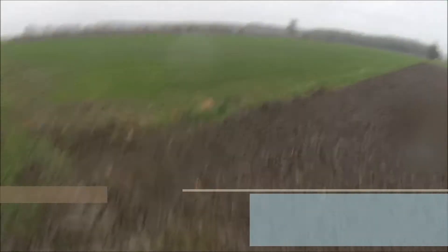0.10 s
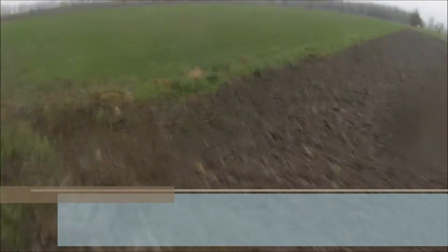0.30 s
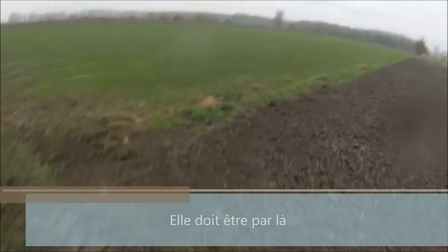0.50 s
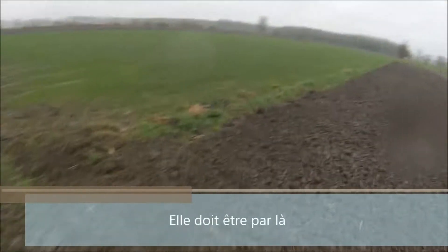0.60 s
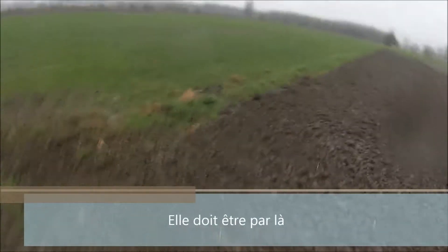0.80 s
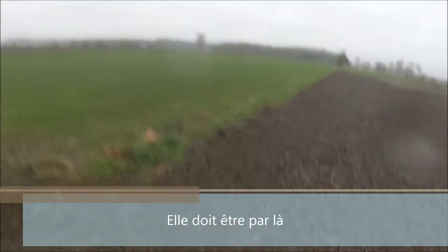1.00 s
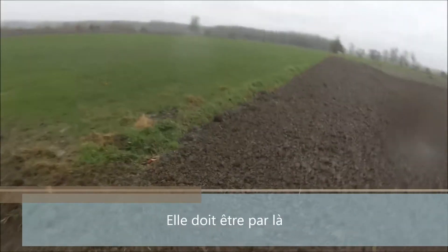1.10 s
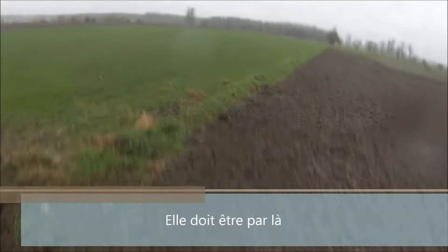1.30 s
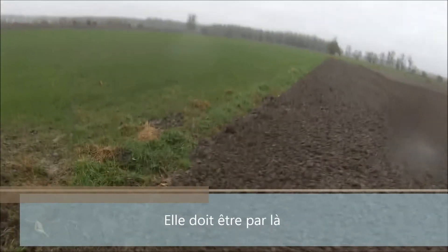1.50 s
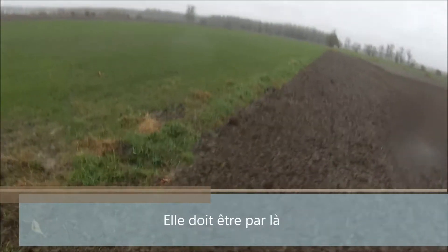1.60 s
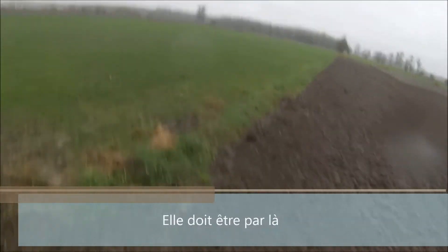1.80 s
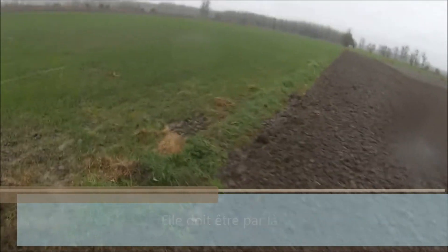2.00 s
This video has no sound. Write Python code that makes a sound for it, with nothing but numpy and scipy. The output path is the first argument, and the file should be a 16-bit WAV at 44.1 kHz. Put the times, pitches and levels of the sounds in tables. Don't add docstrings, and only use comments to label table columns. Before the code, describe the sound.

Rain ticking and pattering on a plastic shell, with low walking jolts and faint cloth rustle

```python
import sys
import numpy as np
from scipy import signal
from scipy.io import wavfile

SR = 44100
rng = np.random.default_rng(int(sys.argv[2]) if len(sys.argv) > 2 else 0)


def to_wav(s):
    ch = np.atleast_2d(s).T
    pcm = np.round(np.clip(ch, -1, 1) * 32767)
    wavfile.write(sys.argv[1], SR, pcm.astype(np.int16))


def ratio_of_db(decibels):
    return 10 ** (np.asarray(decibels, float) / 20)


N = 92610

# (frequency [Hz], level [dB])
HISS_COLOUR = [(70, -13.5), (150, -7), (350, -7), (900, -14), (1900, -13.5), (3500, -19.5), (11000, -30.5),
               (15000, -34.5)]
# (frequency [Hz], level [dB], decay by 60 dB [s])
SHELL_MODES = [(1650, 0, .0105), (2640, -2, .008), (5550, -13, .006), (1850, -34, .075), (6500, -44, .045),
               (400, -23, .005), (1300, -16, .006), (3300, -9, .006), (4300, -22, .004), (7200, -16, .004),
               (8500, -20, .003), (9800, -21, .003), (12200, -25, .003), (14000, -33, .003)]
# (frequency [Hz], level [dB], decay by 60 dB [s])
PANE_MODES = [(2170, -24, .055), (2240, -5, .009), (3120, -28, .04)]
OPPOSED_MODES_HZ = (400, 1300, 2240, 3300)
# (time [s], peak [dB], upper modes against lower [dB], brightness [dB])
SMALL_DROPS = [(0.0074, -47, -12, 11), (0.0186, -38.5, -6, 17), (0.1454, -48, 2, -8),
               (0.1705, -43.5, -6, -3), (0.197, -49, -3, 1), (0.3008, -48, 5, 11), (0.3227, -44.5, -6, 11),
               (0.3601, -39.5, 8, -4), (0.3835, -40, -2, 10.5), (0.408, -54, -6, 2), (0.4394, -42.5, 1, -4),
               (0.5407, -43, 7, 7), (0.5616, -42, 7, 3), (0.5836, -41.5, 4.5, 9.5), (0.614, -50, -9, 0.2),
               (0.637, -42, -3, 19), (0.6689, -48, -2, 18), (0.7706, -50, 4, 15), (0.8051, -41.5, -19, 12),
               (0.8673, -45, -17, 0.2), (0.8949, -46, 4, -4), (1.0106, -43.5, -9, 0.2),
               (1.1648, -46, -13, 8), (1.2645, -43, -7, 1), (1.4147, -43.5, 5, 2), (1.701, -39.5, 2, -9),
               (1.722, -45, 7, -7), (1.744, -39.5, 22, 1), (1.7809, -53, -1, 13), (1.7921, -47, 7, 5.5),
               (1.8317, -55, 2, 5), (1.8552, -49, 3, 22), (1.922, -46, -5, -5), (2.003, -51, -8, -5),
               (1.1243, -50, 15, 12)]
# (time [s], peak [dB], upper modes against lower [dB], brightness [dB], share of the pane [dB])
BIG_DROPS = [(.0235, -30.5, -6, -18, -12), (.0285, -25, 2, -6, 6), (.0296, -18, -2.5, -5.5, 6),
             (.1324, -21, -9.5, -18, 7.5), (.1343, -21.5, -4, -14, 5), (.2192, -29.5, 1.5, 3.5, -4),
             (.2222, -33, -16, -7, -12), (.2289, -27.5, 9, -3, 21), (.238, -35.5, 17, 11, 7),
             (.2655, -31.5, 1.5, 0.5, 3), (.5148, -15, 2, 3, -16), (.8558, -36, -9.5, 12, -1.5),
             (1.0552, -16, 6.5, 5.5, 9.5), (1.2219, -33, 2, -3, -18), (1.5364, -36.5, 2, 9, 16),
             (1.5435, -45, 3, -1, 10), (1.6221, -26, 8, 13, 14), (1.8822, -30.5, 15, 2, 19.5),
             (1.9655, -8.5, 2, 1, 3.5), (2.013, -38, 3, -22, -7), (2.0274, -8, 0, 1, -5)]
# (time [s], peak [dB], upper modes against lower [dB], brightness [dB], share of the pane [dB])
SHARP_DROPS = [(.1098, -37.5, 10, 5.5, -7), (.2641, -27.5, -5, 7.5, 1), (1.0885, -35, 8, 0, -12),
               (1.4225, -46.5, 6, 6, 5), (1.4882, -34.5, 13.5, 1.5, 9), (1.501, -53, 6, 9, 16),
               (1.5405, -39.5, 9, 11, 0), (1.612, -65, 8, 22, -3), (1.6394, -37, 6, 8, 1),
               (1.7499, -32, 13.5, 2, 13.5), (1.932, -31, 0, 2.5, -22), (1.947, -43, -6, 1, 3)]
# (time [s], rustle [dB], dull body [dB], length [s])
WEIGHT_SHIFTS = [
    (0.023, -54.5, -55.5, 0.012),
    (0.252, -50.5, -50, 0.02),
    (0.425, -62.5, -79, 0.044),
    (0.681, -55.5, -51, 0.01),
    (0.971, -66, -77, 0.026),
    (1.11, -65.5, -69.5, 0.046),
    (1.392, -91, -70.5, 0.047),
    (1.498, -67, -67.5, 0.011),
    (1.622, -58, -62, 0.015),
    (1.734, -66, -74, 0.014),
]
# (frequency [Hz], level per Hz [dB])
CLOTH_COLOUR = [(300, -10), (900, -9), (1800, 0), (2500, -3), (3800, -10), (6000, -15), (9500, -23),
                (13000, -40)]
# (frequency [Hz], level per Hz [dB])
BODY_COLOUR = [(70, -18), (130, 1), (300, -3), (600, -14.5), (1500, -37)]
# (time of the upward swing [s], peak [dB], frequency [Hz], dying time [s])
STEP_JOLTS = [(0.2635, -5.6, 27.9, 0.0156), (0.2789, -15.2, 33.3, 0.0246), (0.3021, -24.0, 47.8, 0.004),
              (0.6405, -27.0, 31.8, 0.05), (0.6846, -9.8, 34.0, 0.0127), (0.7242, -23.3, 42.1, 0.0158),
              (0.7872, -34.0, 18.0, 0.033), (1.0101, -33.9, 29.1, 0.0311), (1.1092, -26.2, 36.0, 0.05),
              (1.1501, -19.2, 30.4, 0.0106), (1.2055, -27.9, 18.0, 0.0048), (1.2497, -34.2, 19.8, 0.0308),
              (1.6392, -15.2, 26.6, 0.0206), (1.7186, -28.8, 21.2, 0.02)]
# (time [s], level [dB])
SHAKE_LEVEL = [(0.0, -36), (0.12, -31), (0.27, -15), (0.44, -34.5), (0.61, -34.5), (0.83, -32.5),
               (0.99, -36.5), (1.18, -32), (1.32, -32), (1.48, -32.5), (1.68, -20), (1.81, -39),
               (2.1, -34.5)]

UPPER_HZ, BRIGHT_HZ = 2000, 4500


def rms_one(x):
    return x / np.sqrt(np.mean(x ** 2) + 1e-20)


def drift(rate):
    every, settle = 40, 2000
    r = np.exp(-80 * np.pi * rate / SR)
    slow = signal.lfilter([1], [1, -2 * r, r * r], rng.standard_normal(N // every + settle + 2))[settle:]
    return np.interp(np.arange(N) / every, np.arange(len(slow)), rms_one(slow))


def banded_noise(colour, patchy_db):
    shared, shared_per_s, own_per_s = 0.8, 6, 12
    together = drift(shared_per_s)
    edges = 60 * 2 ** np.arange(0, 8.4, 0.5)
    white = rng.standard_normal((2, N))
    at, db = np.transpose(colour)
    out = 0
    for k, (low, high) in enumerate(zip(edges, edges[1:])):
        band = signal.sosfilt(signal.butter(2, [low, high], "band", fs=SR, output="sos"), white[k % 2])
        level = np.interp(np.log(low * high) / 2, np.log(at), db)
        flicker = patchy_db * (shared * together + drift(own_per_s))
        out = out + band * ratio_of_db(level + flicker)
    return rms_one(out)


def field_hiss():
    return ratio_of_db(-62) * banded_noise(HISS_COLOUR, patchy_db=0.66)


def fine_patter():
    per_s, level_db, spread_db = 380, -75.5, 9
    sizes = ratio_of_db(spread_db * np.minimum(rng.exponential(1, N), 4)) * rng.choice([-1, 1], N)
    born = rng.random(N) < per_s * ratio_of_db(4 * drift(5.0)) / SR
    out = 0
    for hz, db, t60 in SHELL_MODES + PANE_MODES[1:2]:
        r, w = ratio_of_db(-60 / (t60 * SR)), 2 * np.pi * hz / SR
        upper_db = -4 * (UPPER_HZ < hz < BRIGHT_HZ)
        favour_db = 8.5 * rng.standard_normal(N)
        clicks = sizes * born * ratio_of_db(db + upper_db + favour_db) + 1e-18
        out = out + signal.lfilter([0, np.sin(w)], [1, -2 * r * np.cos(w), r * r], clicks)
    return ratio_of_db(level_db) * rms_one(out)


def drop_tick(db, upper_db, bright_db, pane_db, dull_db, chance, variation, fizz):
    t = np.arange(3000) / SR
    hz, mode_db, t60 = np.transpose(SHELL_MODES + PANE_MODES)[:, :, None]
    pane = np.arange(len(hz))[:, None] >= len(SHELL_MODES)
    spread, shift, sign = variation

    shell_db = upper_db * (hz > UPPER_HZ) + bright_db * (hz > BRIGHT_HZ)
    level = mode_db + 1.5 * spread + np.where(pane, pane_db, shell_db)
    soft = db < -17
    level = level - soft * (9 * (t60 > 0.03) + dull_db * (hz > 8000))
    detune, damping = (0.04, 0.8) if soft else (0.012, 1)

    together = (db > -29) & (hz < BRIGHT_HZ)
    splash_s, rise_cycles = 0.000695, 0.38
    since = np.maximum(t - splash_s * chance * np.where(together, 0.2, 1), 0)
    swing = np.where(np.isin(hz, OPPOSED_MODES_HZ), -1, 1)
    polarity = np.where(together, swing, np.sign(sign))
    pitch = hz * (1 + detune * shift * ~pane)
    decay = ratio_of_db(level - 60 * since / t60 / damping)
    rise = 1 - np.exp(-since * hz / rise_cycles)
    tick = (polarity * np.sin(2 * np.pi * pitch * since) * decay * rise).sum(axis=0)

    spray_db, spray_s = -24, 0.0012
    spray = ratio_of_db(spray_db) * fizz * np.exp(-t[:400] / spray_s)
    tick = tick + np.convolve(spray, tick)[:len(t)]
    push_db, push_s = -25.5, 0.00045
    push = ratio_of_db(push_db) * np.e * t / push_s * np.exp(-t / push_s)
    return ratio_of_db(db) * (tick / np.abs(tick).max() - push)


def drops(rows, dull_db):
    out = np.zeros(N + SR)
    count, modes = len(rows), len(SHELL_MODES + PANE_MODES)
    chances = rng.random((count, modes, 1))
    variations = rng.standard_normal((count, 3, modes, 1))
    fizzes = rng.standard_normal((count, 400))
    for row, chance, variation, fizz in zip(rows, chances, variations, fizzes):
        s, db, upper_db, bright_db = row[:4]
        pane_db = row[4] if len(row) > 4 else -6
        tick = drop_tick(db, upper_db, bright_db, pane_db, dull_db, chance, variation, fizz)
        i = int(s * SR)
        out[i:i + len(tick)] += tick
    return out[:N]


def steps():
    s, db, hz, dying = np.transpose(STEP_JOLTS)[:, :, None]
    rise_s, overtone = 0.012, 0.06
    t = np.arange(N) / SR - s
    swing = np.sin(2 * np.pi * hz * t) + overtone * np.sin(4 * np.pi * hz * t)
    envelope = np.exp(-0.5 * (t / np.where(t < 0, rise_s, dying)) ** 2)
    thuds = (ratio_of_db(db) * swing * envelope).sum(axis=0)

    band = signal.butter(2, [22.9, 46], "band", fs=SR, output="sos")
    shake = rms_one(signal.sosfilt(band, rng.standard_normal(N + SR))[SR:])
    shake_db = -16 + np.interp(np.arange(N) / SR, *np.transpose(SHAKE_LEVEL))
    return thuds + shake * ratio_of_db(shake_db)


def rustle():
    s, cloth_db, body_db, length = np.transpose(WEIGHT_SHIFTS)[:, :, None]
    swell = np.exp(-0.5 * ((np.arange(N) / SR - s) / length) ** 2)
    cloth = (ratio_of_db(cloth_db) * swell).sum(axis=0) * banded_noise(CLOTH_COLOUR, patchy_db=1.5)
    lumps = ratio_of_db(2.5 * drift(150))
    body = (ratio_of_db(body_db) * swell).sum(axis=0) * banded_noise(BODY_COLOUR, patchy_db=1.5)
    return cloth * lumps + body


def scene():
    hiss = field_hiss()
    big = drops(BIG_DROPS, dull_db=11.0)
    sharp = drops(SHARP_DROPS, dull_db=0.0)
    small = drops(SMALL_DROPS, dull_db=6)
    rain = big + sharp + small + fine_patter()
    return (rain + steps() + rustle() + hiss)[None]


def low_pass(x):
    return signal.sosfilt(signal.butter(12, 16510, fs=SR, output="sos"), x)


def record(dry):
    mix = signal.sosfilt(signal.cheby2(10, 60, 16800, fs=SR, output="sos"), dry)
    return low_pass(mix)


dry = scene()
out = record(dry)
to_wav(out)
```